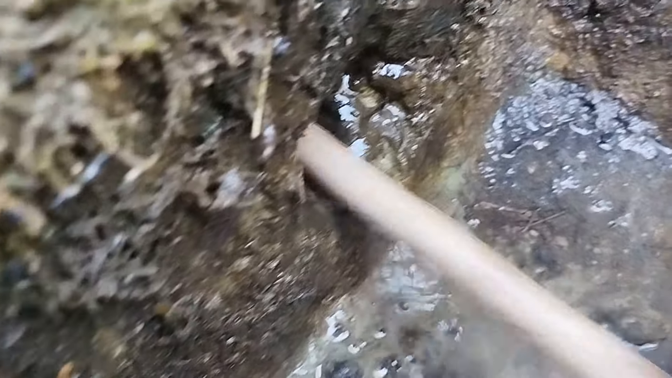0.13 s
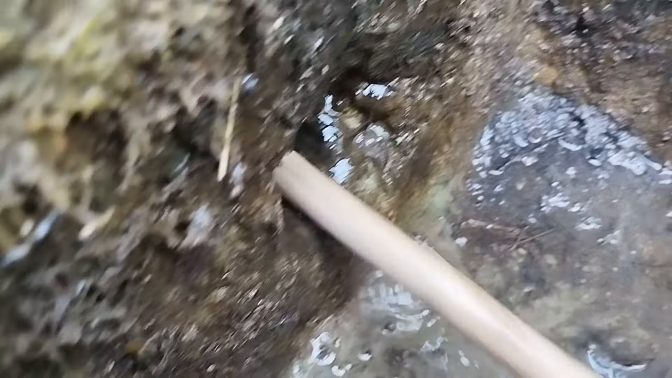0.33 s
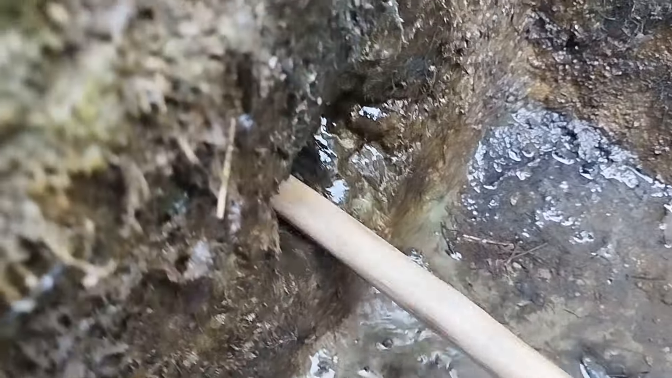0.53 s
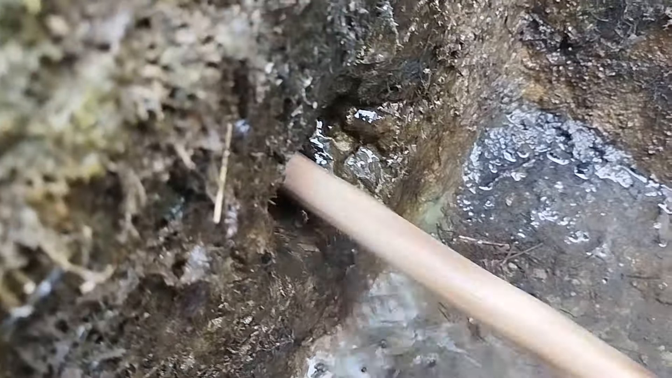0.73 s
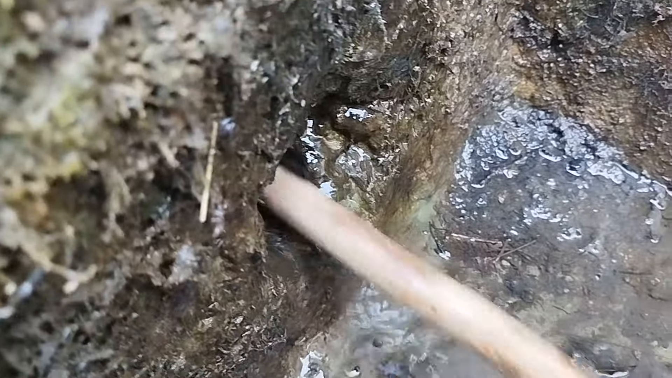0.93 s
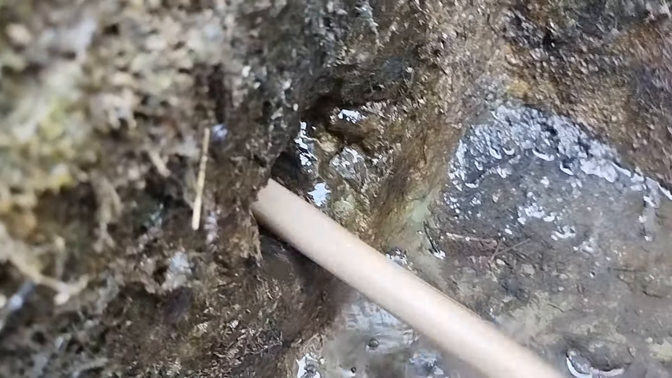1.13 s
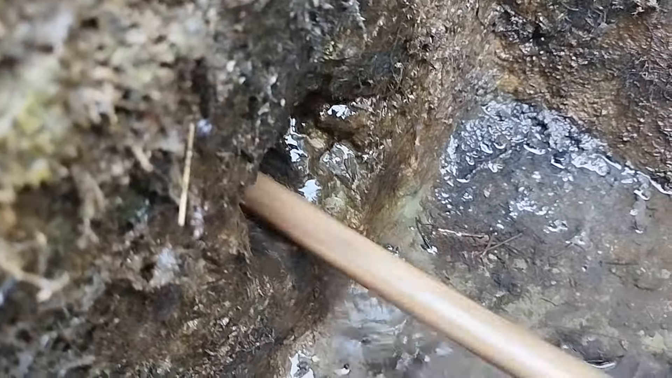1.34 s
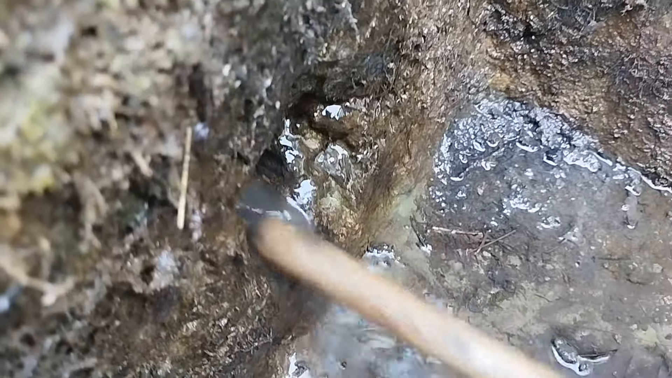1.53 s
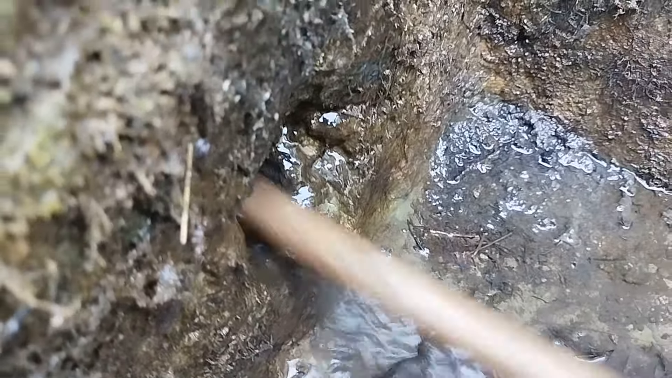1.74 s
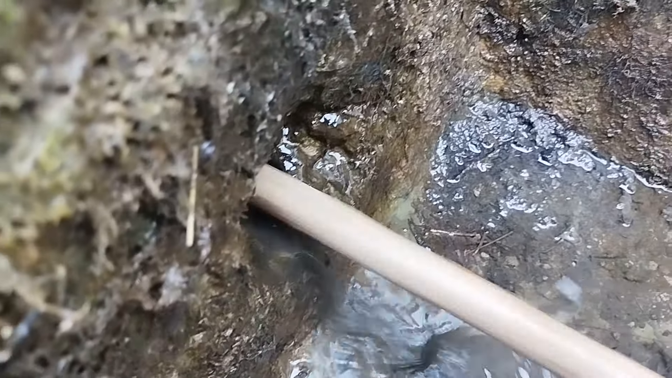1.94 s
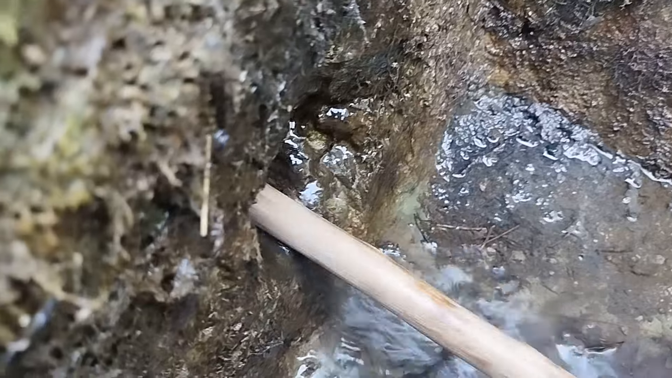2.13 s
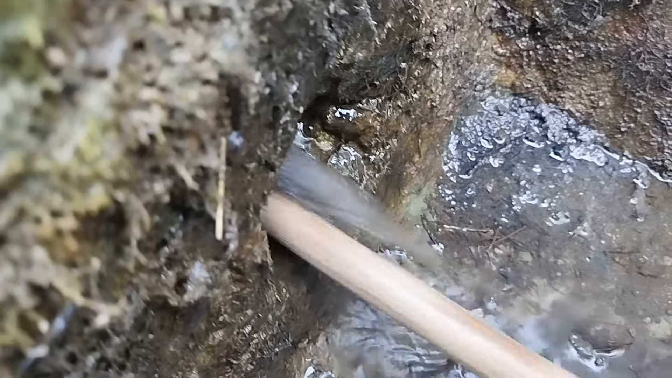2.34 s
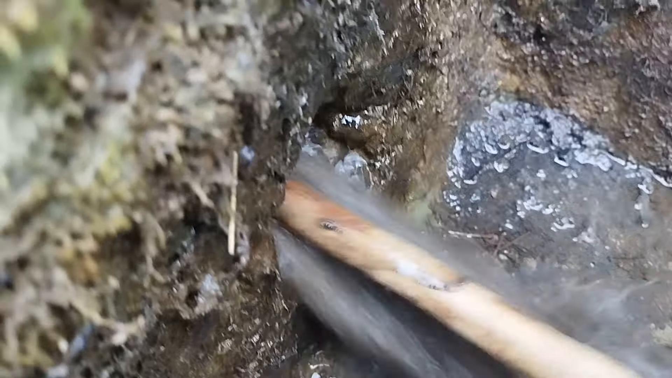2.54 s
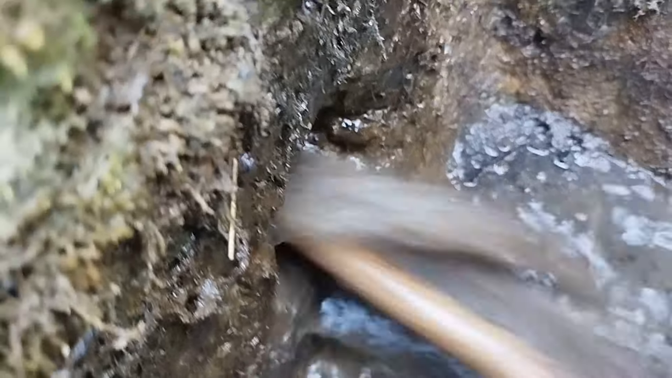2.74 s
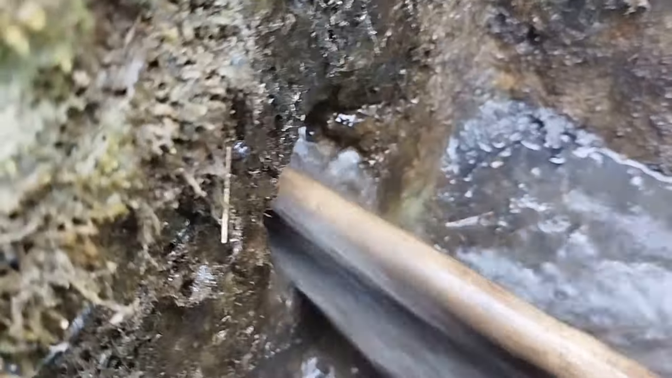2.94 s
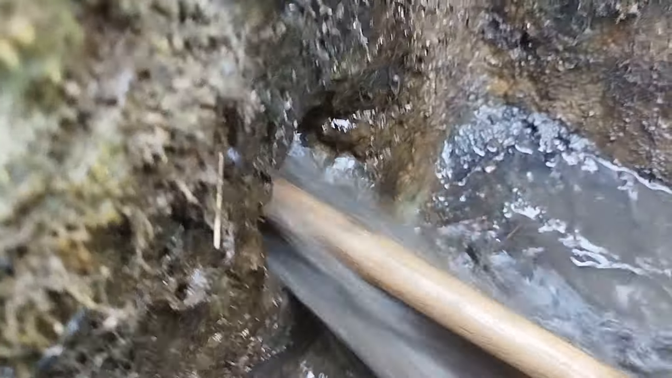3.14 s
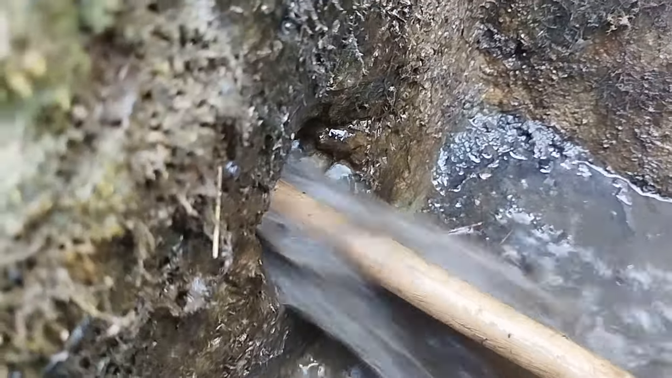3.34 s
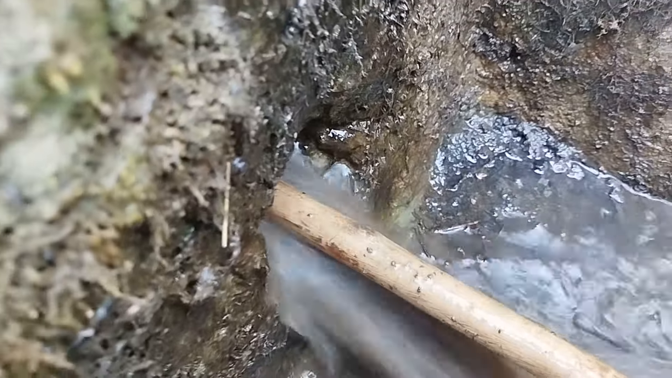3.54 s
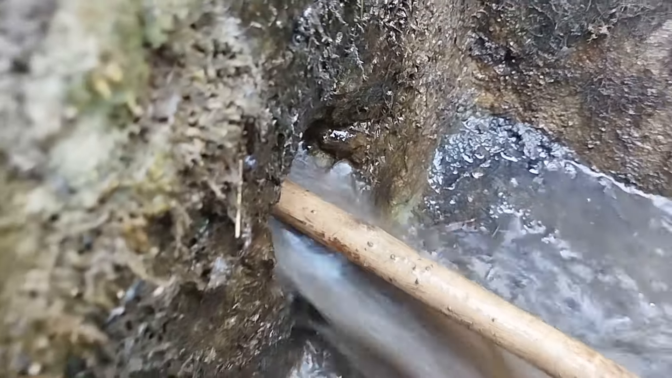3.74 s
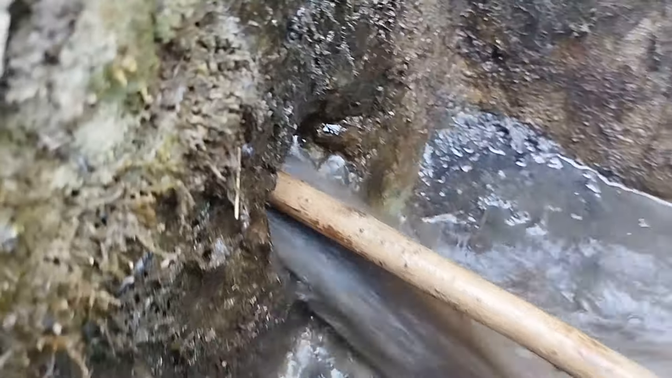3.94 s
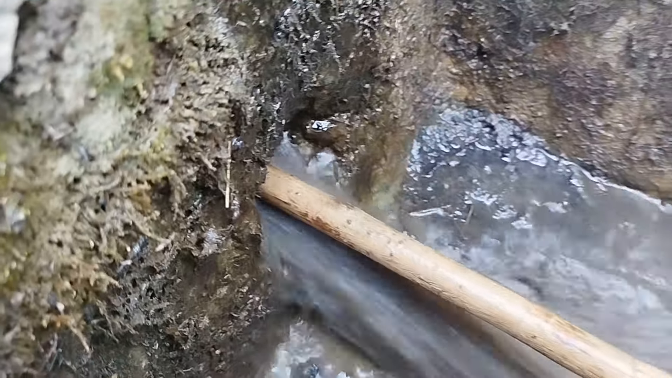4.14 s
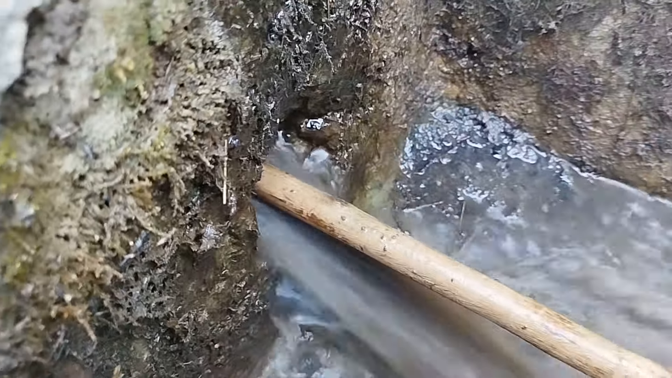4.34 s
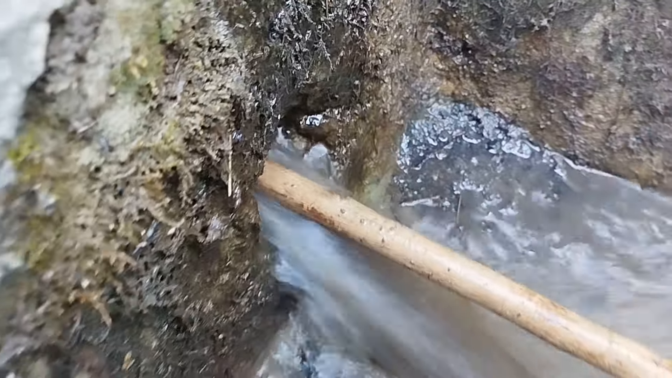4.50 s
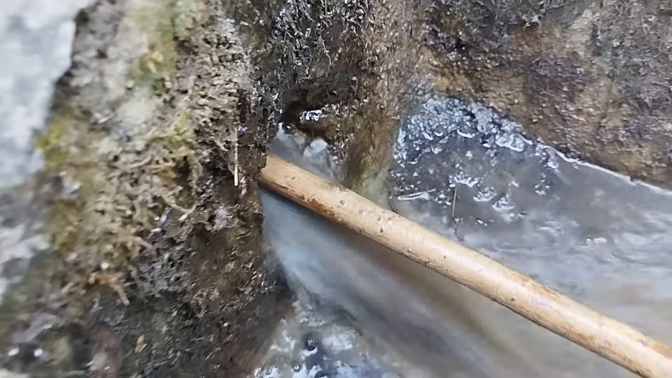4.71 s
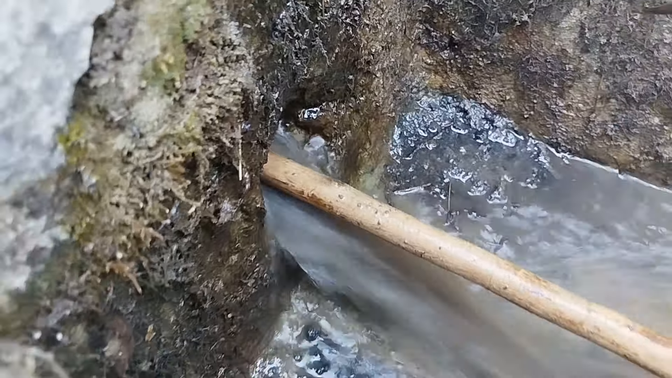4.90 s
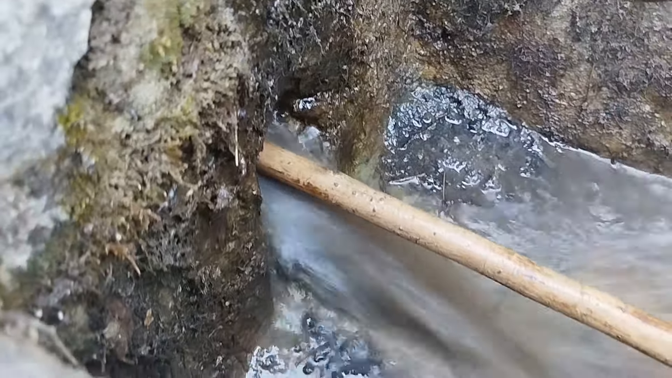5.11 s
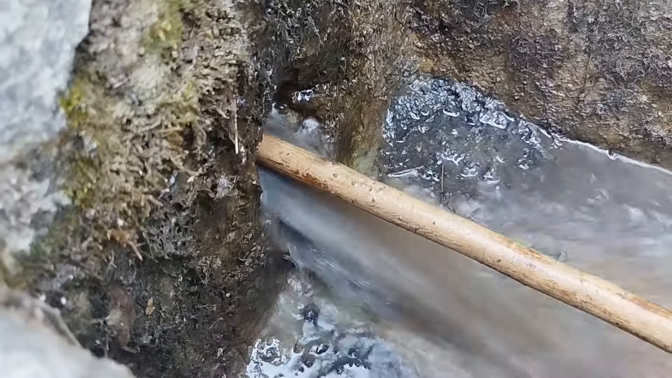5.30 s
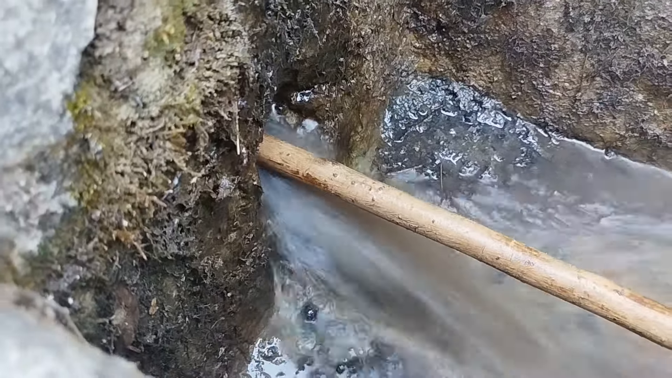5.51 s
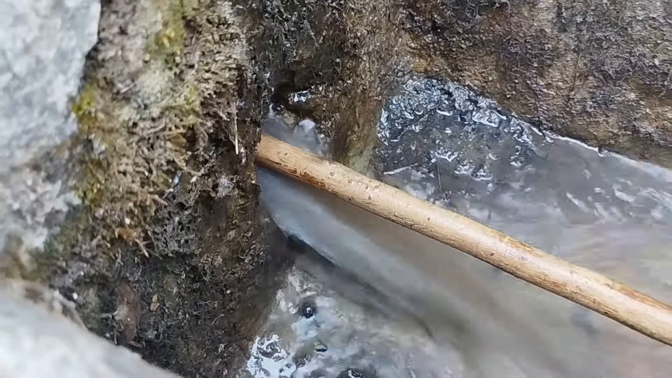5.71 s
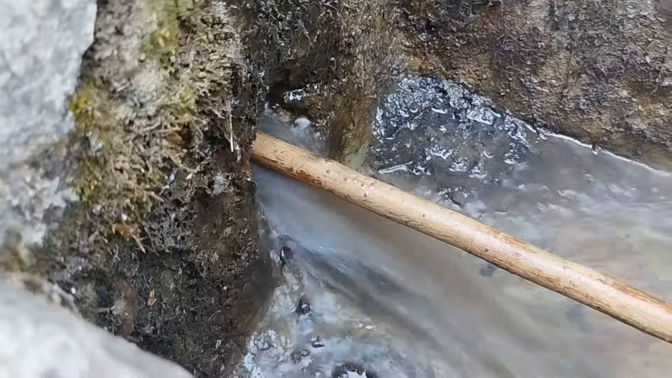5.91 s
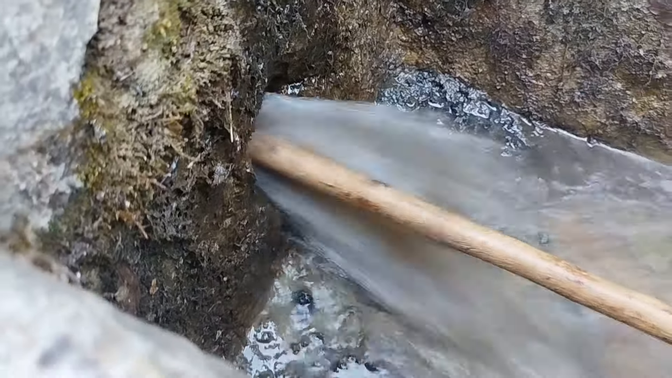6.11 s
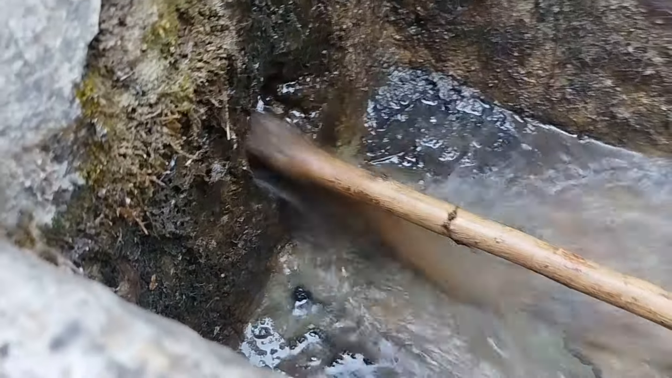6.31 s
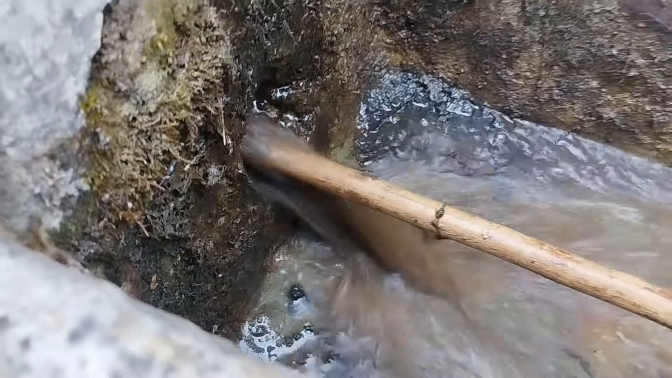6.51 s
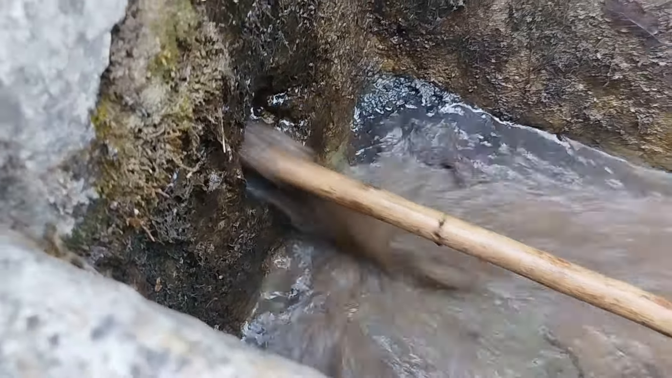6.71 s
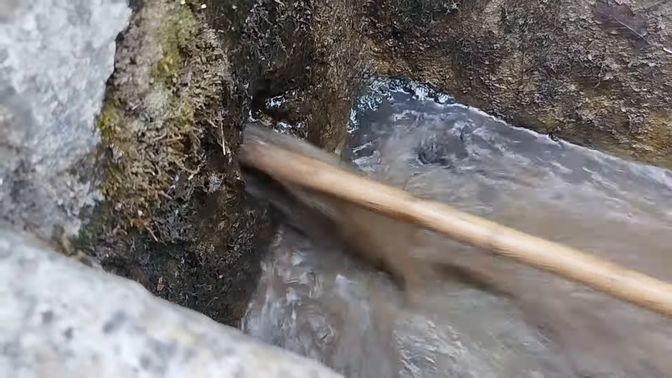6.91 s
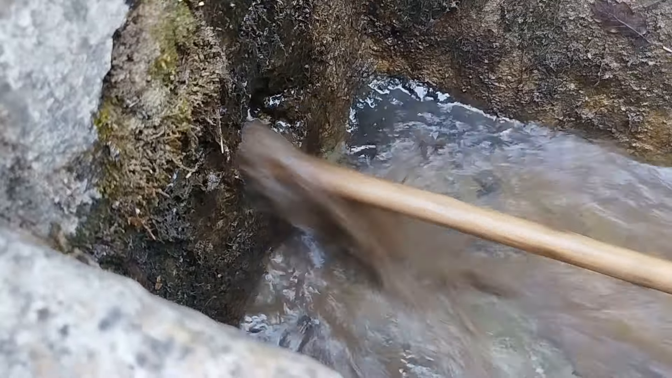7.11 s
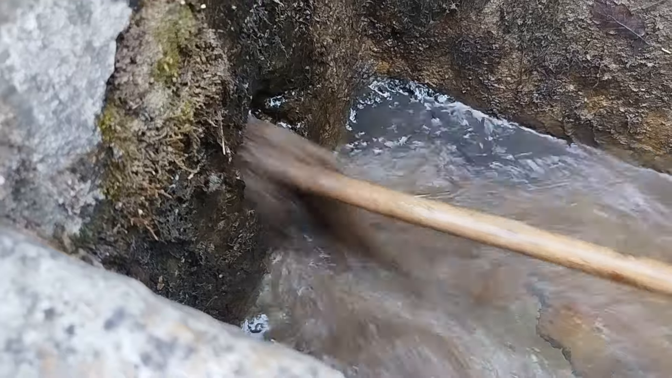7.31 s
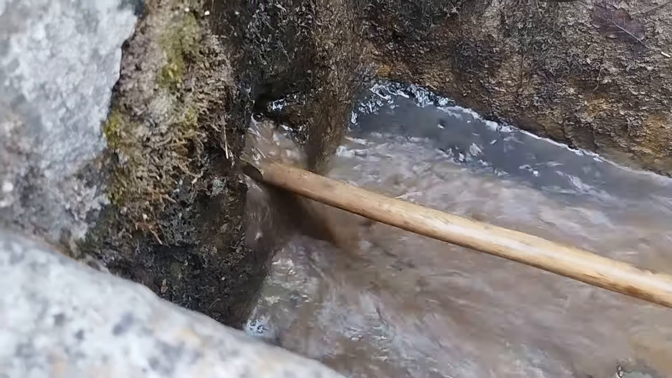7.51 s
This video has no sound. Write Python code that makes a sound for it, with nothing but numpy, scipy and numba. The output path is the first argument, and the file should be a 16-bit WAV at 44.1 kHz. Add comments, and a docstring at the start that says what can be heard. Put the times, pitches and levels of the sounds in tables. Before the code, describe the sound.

Gritty wooden jabs and hollow tocks against wet stone give way to gulping glugs and a loud, lumpy rush of water that sputters out at the end.

```python
"""A long wooden stick is jabbed and scraped in the outlet hole of a stone basin, outdoors: grit crunches as
filtered noise and pings, and the wood hums, knocks and tocks as damped modes. A bird whistles faintly, as
gliding sines. The plug then gives way with a few deep glugs, low tones that bend in pitch, and water gushes
over the stick: a swarm of bubble tones, slaps and spray of shaped noise, and hollow rings of the outlet.
All is heard close to a stereo microphone, and the gush drains away at the end."""
import sys
import numpy as np
from scipy import signal
from scipy.fft import rfft, irfft, next_fast_len
from scipy.io import wavfile
from numba import njit

SR = 44100
rng = np.random.default_rng(int(sys.argv[2]) if len(sys.argv) > 2 else 0)


def dump_mix(stems):
    """Bounce the given channels to the path in sys.argv[1] as a 16-bit WAV at rate SR."""
    frames = np.atleast_2d(stems).T  # one column per channel
    limited = np.clip(frames, -1, 1)  # hard clip at full scale
    pcm = np.round(limited * 32767).astype(np.int16)
    wavfile.write(sys.argv[1], SR, pcm)


N = 332955

# open-air background spectrum: pitch_hz, density_db (relative, per Hz)
AIR_SPECTRUM = [(90, -0.5), (200, -6.5), (400, -10), (600, -7), (800, -18), (2000, -26), (5000, -25),
                (9000, -33), (16300, -33)]
AIR_DB = -55   # rms
# likeness of left and right in all broad noise: pitch_hz, likeness (0-1)
LIKENESS = [(60, 0.5), (180, 0.53), (550, 0.19), (1650, 0.089), (4970, 0), (15000, 0)]

# stick tip catching on stone, each a short crunch: start_s, peak_db, t60_s
CRUNCHES = [(0.0074, -18, 0.063), (0.0267, -24.5, 0.087), (0.05, -13.5, 0.11), (0.2083, -37.5, 0.23),
            (0.344, -26.5, 0.093), (0.36, -26.5, 0.088), (0.5376, -25.5, 0.066), (0.545, -16, 0.17),
            (0.56, -18.5, 0.081), (0.579, -14, 0.072), (0.657, -27.5, 0.12), (0.68, -24, 0.096),
            (0.885, -41, 0.086), (0.9265, -30, 0.035), (0.952, -17, 0.014), (0.966, -16, 0.029),
            (1.0765, -40, 0.049), (1.109, -30, 0.022), (1.207, -25.5, 0.068), (1.277, -32, 0.082),
            (1.306, -35, 0.027), (1.367, -61, 0.047), (1.663, -43.5, 0.11), (1.7157, -37.5, 0.076),
            (1.775, -30, 0.032), (1.8131, -15.5, 0.048), (1.845, -35, 0.079), (1.8738, -16.5, 0.057),
            (2.032, -35, 0.055), (2.0555, -26, 0.062)]
CRUNCH_ATTACK_S = .001
# strokes of the stick rubbing on stone: start_s, length_s, grit_db
STROKES = [(0.0, 0.02, -26.5), (0.215, 0.2, -39), (0.541, 0.097, -34), (0.7, 0.29, -52.5),
           (0.929, 0.15, -33.5), (1.046, 0.15, -31.5), (1.198, 0.19, -54.5), (1.847, 0.058, -32),
           (2.016, 0.12, -48.5)]
STROKE_RISE_DB_PER_S, STROKE_FALL_DB_PER_S = 364, 223
STICK_WORK_S = 2.15   # the rubbing is over by then
# spectrum of grit under the tip: pitch_hz, density_db (relative, per Hz)
GRIT_SPECTRUM = [(60, -48), (130, -2.5), (300, -25), (500, -19), (1000, -11.5), (2400, -8.5), (3200, -13.5),
                 (3800, -14.5), (4400, -7.5), (5300, -12), (7500, -17.5), (9400, -18.5), (12000, -29.5),
                 (16300, -20.5)]
# vibration modes of the stick: pitch_hz, drive_db, t60_s
STICK_MODES = [(446, -34.5, 0.068), (928, -42, 0.12), (1590, -33, 0.08), (2050, -34.5, 0.046),
               (2500, -32.5, 0.037), (4730, -41.5, 0.029), (5230, -43, 0.037)]
KNOCK_DB = -26   # each crunch knocks the strongest mode this far relative to its peak
KNOCK_SPREAD_DB = 3   # from blow to blow and mode to mode
HUM_BELOW_GRIT_DB = 3   # rubbing keeps the stick's bending hum alive
# jolts that bend the whole stick, the grip shifting the pitch: start_s, peak_db, pitch_hz
JOLTS = [(0.015, -15.5, 182.5), (0.05, -12.5, 174.7), (0.22, -36, 184), (0.241, -29.5, 190),
         (0.356, -21, 199), (0.551, -14.5, 191.5), (0.578, -9, 182), (0.713, -23, 178), (0.922, -33, 185),
         (0.969, -20, 194), (1.037, -26, 188), (1.221, -26.5, 190), (1.726, -33, 190), (1.786, -24.5, 178),
         (1.876, -17.5, 186), (1.93, -25.5, 166), (2.03, -32, 176), (2.084, -37, 189), (2.15, -21.5, 198),
         (2.255, -40, 190)]
JOLT_T60_S = 0.25
# hollow tocks of the stick against the rim: start_s, peak_db, pitch_hz
TOCKS = [(0.009, -14.5, 1070), (0.035, -13, 852), (0.056, -12.5, 850), (0.079, -16.5, 843),
         (0.347, -32, 934), (0.431, -28, 703), (0.525, -21, 503), (0.68, -24, 604), (0.83, -41, 916),
         (0.885, -32, 940), (0.965, -25, 924), (1.069, -22, 530), (1.114, -11, 470), (1.124, -17, 1040),
         (1.224, -18.5, 468), (1.302, -30, 990), (1.469, -41, 603), (1.61, -51, 633), (1.654, -34, 480),
         (1.716, -26, 890), (1.776, -31, 2480), (1.814, -20, 438), (1.923, -27, 428)]
TOUCH_T60_S = .04   # weak touches after a tock; the tock itself rings twice as long

# two whistles, the first rising and the second falling, as curves: time_s, pitch_hz, level_db
WHISTLES = [
    [(1.47, 3600, -65), (1.49, 3900, -61), (1.52, 4150, -60), (1.59, 4350, -62), (1.63, 4750, -61),
     (1.66, 5250, -63)],
    [(1.745, 6100, -61), (1.785, 4500, -57)],
]

# course of the jet as a curve: time_s, bubbling_db (reference for swarm and bed), spray_db
FLOW = [(2.051, -41, -41), (2.12, -21, -27), (2.235, -17.5, -30.5), (2.26, -31, -32), (2.301, -19, -34),
        (2.36, -15.5, -21), (2.84, -17.5, -17.5), (2.91, -21, -24), (3.4, -19, -19), (3.64, -21, -28.5),
        (3.72, -18.5, -21.5), (4.12, -17, -22.5), (5.45, -15, -23), (6.14, -17.5, -22.5),
        (6.57, -32.5, -31), (6.72, -36.5, -35), (6.77, -33, -32), (6.95, -22.5, -29.5), (7.2, -30, -29.5),
        (7.331, -26, -29.5), (7.42, -39.5, -37.5), (7.55, -62, -51.5)]
# spectrum of rushing water: pitch_hz, density_db (relative, per Hz)
RUSH_SPECTRUM = [(60, -54), (150, -8.5), (320, -74), (440, -5), (540, -17.5), (800, -4), (1250, 7.5),
                 (2300, 3.5), (3500, -10), (5400, -10.5), (7500, -15), (9500, -17), (12000, -23.5),
                 (14000, -22), (16300, -13)]
# resonances of the air in the outlet and under the stick: pitch_hz, drive_db, t60_s
HOLE_MODES = [(733, -31.5, 0.015), (1048, -35, 0.013), (1286, -46.5, 0.072), (2340, -40, 0.019)]
HOLE_TREND_DB_PER_S = -0.9   # the hole's ring weakens against the bubbling, 0 dB at mid-scene
# water slapping on stone and stick: start_s, peak_db
SPLATS = [(2.224, -17.5), (2.2852, -25), (2.311, -19.5), (2.366, -20), (2.46, -14), (2.5958, -19),
          (2.65, -28), (2.791, -21), (2.988, -14), (3.071, -15.5), (3.468, -18.5), (3.501, -15),
          (3.5525, -13.5), (3.814, -21), (4.072, -16), (4.197, -17), (4.4408, -28), (4.5386, -22),
          (4.65, -19), (5.035, -26), (5.386, -18), (5.5445, -26), (5.73, -20), (6.188, -18.5), (6.657, -28),
          (6.9344, -25), (6.942, -19), (7.006, -18), (7.178, -16), (7.26, -23), (7.302, -22), (7.3215, -14),
          (7.367, -18.5), (7.387, -22), (7.4676, -31), (7.489, -39)]
SPLAT_T60_S, SPLAT_ATTACK_S = 0.047, 0.0014
LESSER_SPLATS_DB = 1   # lesser slaps come at random, scattered about this far above the spray

# big bubbles that stand out: start_s, level_db, pitch_hz, t60_s
PLOPS = [(2.083, -21, 1340, 0.16), (2.112, -7.5, 1230, 0.028), (2.112, -10, 1630, 0.046),
         (2.128, -12, 1265, 0.1), (2.129, -20.5, 710, 0.095), (2.173, -4, 2260, 0.017),
         (2.223, -3.5, 1090, 0.023), (2.231, -3, 1370, 0.017), (2.233, -12, 398, 0.013),
         (2.368, -5, 1280, 0.021), (2.373, -1, 403, 0.0115), (2.476, -4, 2050, 0.021),
         (2.512, -10, 1053, 0.057), (2.515, -4.5, 1330, 0.045), (2.6, -3.5, 1300, 0.018),
         (2.653, -4, 1015, 0.028), (2.772, 2, 2210, 0.018), (2.812, 4, 1940, 0.017),
         (2.833, -9, 2000, 0.013), (2.878, -6, 1026, 0.026), (2.894, 3, 1110, 0.014),
         (2.946, -2.5, 1065, 0.042), (3.047, -4.5, 1010, 0.028), (3.073, 5, 2160, 0.021),
         (3.107, -3, 1230, 0.018), (3.238, -7, 2010, 0.034), (3.361, 0, 1930, 0.0133),
         (3.408, -3, 1320, 0.026), (3.429, 3, 1400, 0.021), (3.476, -7.5, 1840, 0.047),
         (3.582, -4, 1270, 0.034), (3.797, -1, 1500, 0.018), (3.898, 0, 700, 0.032),
         (3.961, 2.5, 1320, 0.024), (3.979, -6, 1450, 0.047), (4.0, 2, 837, 0.015),
         (4.071, -1.5, 1310, 0.026), (4.08, -10.5, 953, 0.15), (4.107, -4, 1410, 0.013),
         (4.181, 2.5, 1100, 0.033), (4.22, -2.5, 2160, 0.017), (4.313, -5.5, 1150, 0.03),
         (4.377, -5, 1310, 0.034), (4.507, -6, 1035, 0.024), (4.537, -6, 1260, 0.029),
         (4.701, -2, 740, 0.024), (4.738, -5, 860, 0.034), (4.886, -2.5, 1600, 0.031),
         (4.929, -2, 1250, 0.039), (5.016, -6, 1280, 0.064), (5.075, 0.5, 1230, 0.029),
         (5.246, -2, 656, 0.022), (5.417, -3.5, 1266, 0.067), (5.454, 1.5, 766, 0.029),
         (5.478, -6.5, 1190, 0.042), (5.541, -12.5, 1247, 0.071), (5.568, -7, 1284, 0.027),
         (5.728, 0, 1060, 0.024), (5.868, -9.5, 1160, 0.037), (5.869, -4.5, 700, 0.029),
         (5.945, 1.5, 900, 0.01), (5.971, 0.5, 735, 0.024), (6.073, 2.5, 1200, 0.012),
         (6.1, -2, 1405, 0.031), (6.119, -2.5, 1520, 0.024), (6.23, -0.5, 1724, 0.017),
         (6.321, -6.5, 1750, 0.042), (6.357, -12, 990, 0.033), (6.425, -3, 2760, 0.018),
         (6.451, -1, 1720, 0.01), (6.533, -2.5, 1700, 0.013), (6.548, -14, 2760, 0.042),
         (6.637, -3, 990, 0.038), (6.848, -12, 2398, 0.022), (6.865, -12, 1316, 0.04),
         (6.942, -14, 1690, 0.024), (6.945, -10, 1060, 0.029), (7.103, -11.5, 1710, 0.022),
         (7.12, -11.5, 1055, 0.033), (7.288, -5.5, 2480, 0.019), (7.308, 1.5, 2160, 0.014),
         (7.319, -11, 1690, 0.021), (7.325, -6, 1220, 0.014), (7.351, -7.5, 2110, 0.022),
         (7.371, -7, 2730, 0.011)]
PLOP_SLAP_DB, PLOP_SLAP_T60_S = -21, 0.038   # each opens with a short broad slap, relative to level_db

# air gulped into the hole as the plug breaks: start_s, peak_db, pitch_hz, pitch_change (fraction over t60)
GLUGS = [(2.111, -18, 436, -0.5), (2.173, -9, 228, -0.2), (2.2, -13, 200, 0.4), (2.235, -4.5, 169, -1.1),
         (2.289, -16, 300, 4), (2.326, -15, 238, 5), (2.376, -11.5, 377, -1.2), (2.386, -22, 158, -3),
         (2.424, -12, 302, -0.5), (2.453, -10, 193, -0.35), (2.458, -10.5, 407, 0), (2.568, -12, 325, 0),
         (2.576, -24.5, 129, 0), (2.745, -31, 224, 0.5), (2.778, -33, 119, 2.5)]
GLUG_CYCLES = 13   # cycles of the starting pitch until 60 dB down
# low churning while the plug breaks up swells to a crest and drains away to a faint rest
CHURN_CREST_S, CHURN_DB, CHURN_REST_DB = 2.43, -31, -67.5
CHURN_RISE_DB_PER_S, CHURN_FALL_DB_PER_S = 78, 75

# knocks on the air left in the outlet, each a low hollow ring: crest_s, level_db
GULPS = [(2.813, -17), (2.994, -25), (3.17, -22), (3.223, -29), (3.37, -20), (3.44, -29), (3.623, -28),
         (3.9, -37), (4.091, -19), (4.236, -27), (4.445, -27), (4.509, -19), (4.74, -27), (4.972, -30),
         (5.052, -17), (5.483, -25), (5.531, -22), (5.668, -22.5), (5.937, -15), (6.238, -18.5),
         (6.447, -42), (6.537, -30), (6.901, -22.5), (7.003, -22.5), (7.085, -24.5), (7.21, -32)]
GULP_HZ, GULP_T60_S, GULP_SWELL_S = 449, 0.06, 0.00688

# lumps of water tumbling out, each a clump of short bubbles: centre_s, level_db
SURGES = [(3.015, -13), (3.232, -12.5), (3.505, -20), (3.554, -7), (4.446, -13), (4.509, -14), (4.588, -12),
          (4.626, -8), (4.661, -12), (4.818, -13), (4.865, -13.5), (5.051, -8), (5.127, -13), (5.525, -29),
          (5.7, -15), (5.788, -8), (5.836, -13), (6.009, -10.5), (6.513, -20.5), (6.554, -21.5),
          (6.671, -24), (6.758, -33), (6.805, -18), (7.01, -17), (7.251, -30), (7.477, -56)]
SURGE_SWELL_S, SURGE_T60_S, SURGE_HZ, SURGE_FROTH_DB = 0.018, 0.016, 1114, -9.5

# level difference of the microphone pair: pitch_hz, left_minus_right_db
TILT = [(60, 1), (330, 3), (600, 2.5), (1200, -0.5), (2000, -4), (4500, -4.5), (6200, -1), (7200, -4.5),
        (9500, 13), (11000, 3.5), (12500, 7.5), (16000, -4.5)]
# notches of the microphone port: pitch_hz, width_hz, depth (0-1)
NOTCHES = [(6170, 450, 0.6), (12330, 600, 0.8)]
LOW_CUT_HZ, CUTOFF_HZ = 96.4, 15900


def amp(db):
    """Logarithmic level: decibels become an amplitude ratio."""
    return 10 ** (np.asarray(db) / 20)


def rms_one(x):
    """Mean power: scale to unit rms."""
    return x / np.sqrt(np.mean(x ** 2) + 1e-20)


def butter(order, hz, kind, x):
    """Maximally flat filtering of a signal."""
    return signal.sosfilt(signal.butter(order, hz, kind, fs=SR, output="sos"), x)


def in_time(rows):
    """Linear interpolation: a curve's columns at every sample, and a gate with 20 ms fades just outside it."""
    s, *columns = np.transpose(rows)
    t = np.arange(N) / SR
    opening = np.clip((t - s[0]) / .02 + 1, 0, 1)
    closing = np.clip((s[-1] - t) / .02 + 1, 0, 1)
    return [np.interp(t, s, c) for c in columns] + [opening * closing]


def at_hz(points, hz):
    """Spectral envelope: read a curve on a log-frequency axis."""
    point_hz, value = np.transpose(points)
    return np.interp(np.log(hz + 1), np.log(point_hz + 1), value)


def drift(rate):
    """Low-passed chance: a random curve of unit rms, about rate Hz wide, made at a twentieth of SR."""
    r = np.exp(-40 * np.pi * rate / SR)
    white = rng.standard_normal(N // 20 + 2002)
    slow = signal.lfilter([1], [1, -2 * r, r * r], white)[2000:]   # drop the filter's settling
    return np.interp(np.arange(N) / 20, np.arange(len(slow)), rms_one(slow))


def ring(x, hz, t60):
    """Damped resonance: a unit click sets a sine of height 1 ringing."""
    r, w = amp(-60 / (t60 * SR)), 2 * np.pi * hz / SR
    return signal.lfilter([0, np.sin(w)], [1, -2 * r * np.cos(w), r * r], x + 1e-18)


def noise(spectrum, flicker_db, patch_db, rate):
    """Shaped stereo noise of rms 1: its octave bands flicker partly together, partly alone."""
    size = next_fast_len(N)
    hz = np.arange(size // 2 + 1) * SR / size
    mid, side = rfft(rng.standard_normal((2, size)))
    alike = np.clip(at_hz(LIKENESS, hz), 0, 1)
    left_right = np.sqrt(1 + alike) * mid + np.sqrt(1 - alike) * side * [[1], [-1]]
    pair = amp(at_hz(spectrum, hz)) * left_right
    octave = np.clip(np.log2(hz / 250 + 1e-9), 0, 6)
    together_db = flicker_db * drift(rate)
    out = 0
    for k in range(7):
        share = np.sqrt(np.clip(1 - np.abs(octave - k), 0, 1))
        band = irfft(pair * share, size)[:, :N]
        out = out + amp(together_db + patch_db * drift(rate)) * band
    return rms_one(out)


def bursts(s, level_db, t60, attack):
    """Impulsive envelope: it swells from each moment to a peak in dB and decays exponentially."""
    out = np.zeros(N + SR)
    for start, gain, ring_s in np.broadcast(s, amp(level_db), t60):
        t = np.arange(int((ring_s + attack) * SR)) / SR
        decay = amp(-60 * np.maximum(t - attack, 0) / ring_s)
        out[int(start * SR):][:len(t)] += gain * decay * np.minimum(t / attack, 1)
    return out[:N]


def swell(start, length, level_db, rise_db, fall_db):
    """Exponential growth and decay: a dB level rises steadily until start, holds, then falls steadily."""
    t = np.arange(N) / SR
    before, after = np.maximum(start - t, 0), np.maximum(t - start - length, 0)
    return level_db - rise_db * before - fall_db * after


@njit
def add(out, rows, sr):
    """Superposition: add dying tones from start_s, pitch_hz, gain, t60_s, rise, attack_s, pan_db, right_lag_s."""
    for s, hz, gain, t60, rise, attack, pan, lag in rows:
        for side in range(2):
            start = int((s + side * lag) * sr)
            height = gain * 10 ** ((.5 - side) * pan / 20)
            for i in range(max(0, -start), min(int(t60 * sr), out.shape[1] - start)):
                t = i / sr
                envelope = min(t / attack, 1.) * 1000 ** (-t / t60)
                # the pitch changes by the fraction rise over t60
                phase = 2 * np.pi * hz * t * (1 + rise * t / t60 / 2)
                out[side, start + i] += height * envelope * np.sin(phase)


def tones(s, *columns):
    """Damped oscillation: dying tones with the columns of add, any of which may be a single value."""
    out = np.zeros((2, N))
    add(out, np.stack(np.broadcast_arrays(s, *columns), axis=1).astype(float), SR)
    return out


def cluster(s, level_db, hz, count, spread, within_s, below_db):
    """Random scatter: start_s, pitch_hz and gain of neighbours soon after each event, spread in octaves."""
    draw = rng.random((len(s), count, 3))
    at = s[:, None] + within_s * draw[..., 0]
    pitch = hz[:, None] * 2 ** (spread * (draw[..., 1] - .4))
    gain = amp(level_db[:, None] - below_db - 3.2 * draw[..., 2])
    return at.ravel(), pitch.ravel(), gain.ravel()


def open_air():
    """Broadband noise: a faint outdoor floor, slowly flickering."""
    return amp(AIR_DB) * noise(AIR_SPECTRUM, flicker_db=1.5, patch_db=1.5, rate=8.)


def grains(force, per_s):
    """Brittle fracture: sand grains crack as short pings of any pitch, a few much louder than the rest."""
    draw = rng.random((int(per_s * STICK_WORK_S), 4))
    s = draw[:, 0] * STICK_WORK_S
    hz = 350 * (11000 / 350) ** draw[:, 1]
    size_db = -4.2 * np.log(1 - .99 * draw[:, 2]) + at_hz(GRIT_SPECTRUM, hz) + 4 * np.log2(hz)
    lag = 0.0008 * (draw[:, 3] - .5)
    pings = tones(s, hz, amp(size_db), 26.0 / hz, 0, 0.0004, 0, lag)
    return force * pings / np.sqrt(np.mean(pings[:, :int(STICK_WORK_S * SR)] ** 2))


def knocks():
    """Impact excitation: each crunch strikes every mode of the stick with its own chance strength."""
    s, peak_db, _ = np.transpose(CRUNCHES)
    hz, mode_db, t60 = np.transpose(STICK_MODES)[..., None]
    scatter_db = KNOCK_SPREAD_DB * rng.standard_normal((len(STICK_MODES), len(s)))
    strength_db = KNOCK_DB + peak_db + mode_db - mode_db.max() + scatter_db
    columns = np.broadcast_arrays(s, hz, amp(strength_db), t60)
    return tones(*[c.ravel() for c in columns], 0, 0.00033, 0, 0)


def jolts():
    """Bending vibration: each jolt rings the whole stick at a low pitch."""
    s, level_db, hz = np.transpose(JOLTS)
    return tones(s, hz, amp(level_db), JOLT_T60_S, 0, 0.0018, 0, 0)


def tocks():
    """Repeated impact: a hollow tone at the rim, stuttering in weaker touches at nearby pitches."""
    s, level_db, hz = np.transpose(TOCKS)
    touches = cluster(s, level_db, hz, count=3, spread=.3, within_s=.03, below_db=11)
    stutter = tones(*touches, TOUCH_T60_S, 0, 0.0013, 0, 0)
    return stutter + tones(s, hz, amp(level_db), 2 * TOUCH_T60_S, 0, 0.0045, 0, 0)


def stick():
    """Friction and forced vibration: grit under the tip crunches and shakes the stick's modes."""
    rub = sum(amp(swell(*row, STROKE_RISE_DB_PER_S, STROKE_FALL_DB_PER_S)) for row in STROKES)
    force = rub + bursts(*np.transpose(CRUNCHES), CRUNCH_ATTACK_S)
    rough = force * noise(GRIT_SPECTRUM, flicker_db=2.2, patch_db=4, rate=45.)
    grit = rough + amp(-1) * grains(force, per_s=3500)
    wood = 0
    for hz, level_db, t60 in STICK_MODES:
        # the contact point wanders, so each mode is fed unevenly
        feed = force * amp(level_db + 4.5 * drift(37.0)) * rng.standard_normal(N)
        wood = wood + ring(feed, hz, t60)
    hum = amp(-HUM_BELOW_GRIT_DB) * rub * rms_one(ring(rng.standard_normal(N), 196.4, 0.11))
    return grit + wood + knocks() + hum + jolts() + tocks()


def bird():
    """Frequency modulation: thin far-off whistles, wavering in level and pitch."""
    out = 0
    for hz, level_db, gate in map(in_time, WHISTLES):
        wavering_hz = hz * (1 + .012 * drift(120.))
        level = gate * amp(level_db + 3 * drift(60.))
        out = out + level * np.sin(2 * np.pi * np.cumsum(wavering_hz) / SR)
    return out


def bubbles(level, count):
    """Bubble resonance: a swarm born in clumps all over the jet, each with its own lag between the ports."""
    draw = rng.random((count, 5))
    births = np.cumsum((level > 0) * amp(5.5 * drift(25.)))
    s = np.interp(draw[:, 0], births / births[-1], np.arange(N) / SR)
    hz = 420 * (2900 / 420) ** draw[:, 1]
    size_db = -3.0 * np.log(1 - .97 * draw[:, 2]) + at_hz(RUSH_SPECTRUM, hz) + 3 * np.log2(hz)
    pan_db, lag = 6 * (draw[:, 3] - .5), 0.00076 * (draw[:, 4] - .5)
    swarm = tones(s, hz, amp(size_db), 45.6 / hz, 0.17, 0.00106, pan_db, lag)
    return level * swarm / np.sqrt(np.mean(swarm[:, level > 0] ** 2))


def hole(swarm):
    """Cavity resonance: the bubbling drives the air in the outlet, unevenly and more weakly with time."""
    trend_db = HOLE_TREND_DB_PER_S * (np.arange(N) - N / 2) / SR
    return sum(amp(level_db + trend_db + 3.5 * drift(10.)) * ring(swarm, hz, t60)
               for hz, level_db, t60 in HOLE_MODES)


def at_random(column, above_db, count):
    """Chance events: moments while the jet runs, with levels scattered about one column of the flow."""
    flow, draw = np.array(FLOW), rng.random((count, 2))
    s = flow[0, 0] + (flow[-1, 0] - flow[0, 0]) * draw[:, 0] * .99
    level_db = np.interp(s, flow[:, 0], flow[:, column])
    return s, level_db + above_db + 3.2 * (draw[:, 1] - .5)


def slaps():
    """Impact of water on solids: the envelope of listed and lesser chance splats."""
    lesser = at_random(2, LESSER_SPLATS_DB, count=55)   # column 2: spray_db
    return bursts(*np.hstack([np.transpose(SPLATS), lesser]), SPLAT_T60_S, SPLAT_ATTACK_S)


def jet():
    """Turbulence and bubble resonance: bubbling, a churning low bed, and spray with slaps in the treble."""
    bubbling_db, spray_db, gate = in_time(FLOW)
    swarm = bubbles(gate * amp(bubbling_db - 3), count=6000)
    low = butter(4, 3200, "low", noise(RUSH_SPECTRUM, flicker_db=2.5, patch_db=2.5, rate=45.))
    high = butter(4, 3200, "high", noise(RUSH_SPECTRUM, flicker_db=1.5, patch_db=3.0, rate=100.0))
    big, openings = plops()
    clumps, froth = surges()
    bed = (gate * amp(bubbling_db - 11) + openings + froth) * rms_one(low)
    spray = (gate * amp(spray_db) + slaps()) * rms_one(high)
    return swarm + hole(swarm) + big + gulps() + clumps + bed + spray


def plops():
    """Bubble resonance: big bubbles amid smaller ones, a little early at the left port; and slap envelopes."""
    s, level_db, hz, t60 = np.transpose(PLOPS)
    place = rng.uniform(-1.9, 1, (len(s), 2))
    pan_db, lag = 3 * place[:, 0], 0.00017 + 0.00008 * place[:, 1]
    big = tones(s - .0012, hz, amp(level_db + 1.5), t60, 0.15, 0.0035, pan_db, lag)
    at, pitch, gain = cluster(s, level_db, hz, count=6, spread=1.3, within_s=.022, below_db=12)
    small_lag = rng.uniform(0.0001, 0.00028, len(at))
    small = tones(at, pitch, gain, 22. / pitch, 0.51, 0.0019, 0, small_lag)
    return big + small, bursts(s, level_db + PLOP_SLAP_DB, PLOP_SLAP_T60_S, 0.0056)


def glugs():
    """Resonance of large air pockets: low rings bend in pitch and tear into smaller ones, over a lumpy churn."""
    s, level_db, hz, rise = np.transpose(GLUGS)
    pockets = tones(s, hz, amp(level_db), GLUG_CYCLES / hz, rise, 0.0021, 0, 0)
    at, pitch, gain = cluster(s, level_db, hz, count=3, spread=1.9, within_s=.012, below_db=8)
    torn = tones(at, pitch, gain, 9. / pitch, 0.12, 0.00027, 0, 0)
    crest = amp(swell(CHURN_CREST_S, 0, CHURN_DB, CHURN_RISE_DB_PER_S, CHURN_FALL_DB_PER_S))
    flowing = in_time(FLOW)[-1]
    lumps = amp(6 * drift(25.))
    rumble = rms_one(butter(2, [100, 330], "band", rng.standard_normal(N)))
    return pockets + torn + flowing * (crest + amp(CHURN_REST_DB)) * lumps * rumble


def gulps():
    """Cavity resonance: hollow rings of the outlet air, their pitches scattered a little by chance."""
    s, level_db = np.transpose(GULPS)
    hz = GULP_HZ * (1 + .04 * rng.standard_normal(len(s)))
    return tones(s - GULP_SWELL_S, hz, amp(level_db + 5), GULP_T60_S, 0.11, GULP_SWELL_S, 0, .0001)


def surges():
    """Collective bubble resonance: clumps of short bubbles of many pitches, and the envelope of their froth."""
    s, level_db = np.transpose(SURGES)
    start, centre_hz = s - SURGE_SWELL_S, np.full(len(s), SURGE_HZ)
    at, pitch, gain = cluster(start, level_db, centre_hz, count=12, spread=1.82, within_s=0.033, below_db=-1.0)
    clumps = tones(at, pitch, gain, 15. / pitch, .3, 0.0015, 0, rng.uniform(0, .0003, len(at)))
    return clumps, bursts(start, level_db + SURGE_FROTH_DB, SURGE_T60_S, SURGE_SWELL_S)


def scene():
    """Superposition: all sources over the open-air floor."""
    return open_air() + stick() + bird() + jet() + glugs()


def record(dry):
    """Linear filtering and clipping: the ports differ in colour and share two notches; lows and top are cut."""
    size = next_fast_len(N)
    tilt_db = at_hz(TILT, np.arange(size // 2 + 1) * SR / size) / 2
    x = irfft(rfft(dry, size) * amp([tilt_db, -tilt_db]), size)[:, :N]
    for hz, width_hz, depth in NOTCHES:
        peak = signal.lfilter(*signal.iirpeak(hz, hz / width_hz, SR), x)
        x = x - np.clip(depth, 0, 1) * peak
    x = butter(7, LOW_CUT_HZ, "high", np.clip(x, -.8, .8))
    return signal.sosfilt(signal.ellip(12, .5, 60, CUTOFF_HZ, fs=SR, output="sos"), x)


dry = scene()
out = record(dry)
dump_mix(out)
```